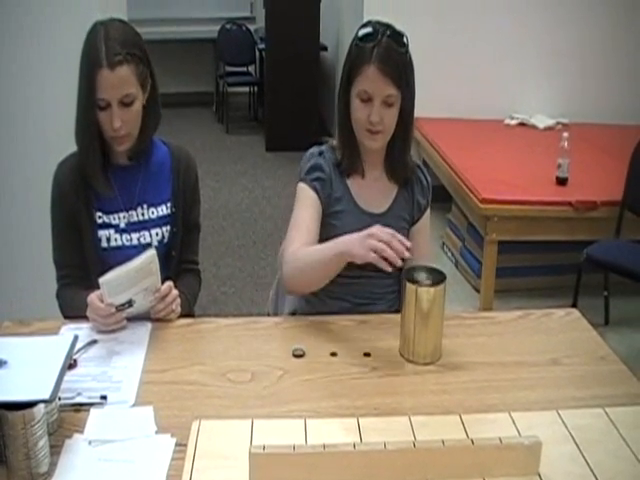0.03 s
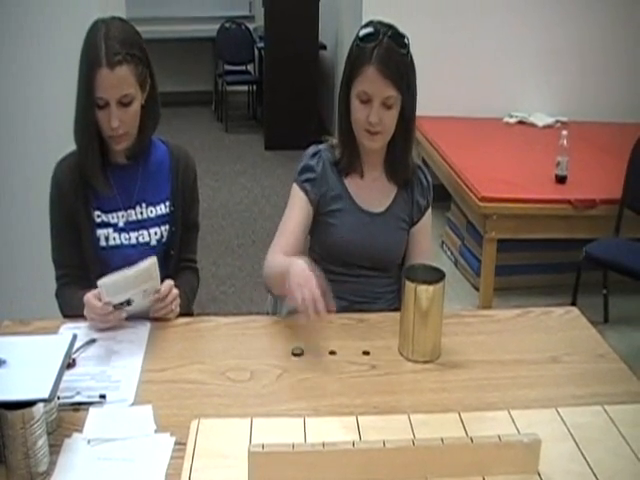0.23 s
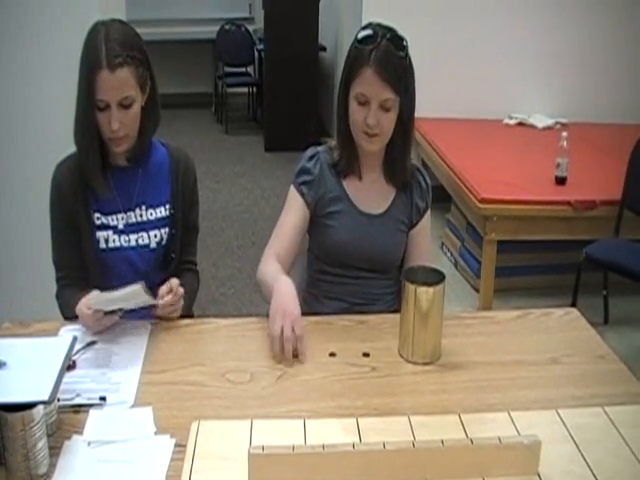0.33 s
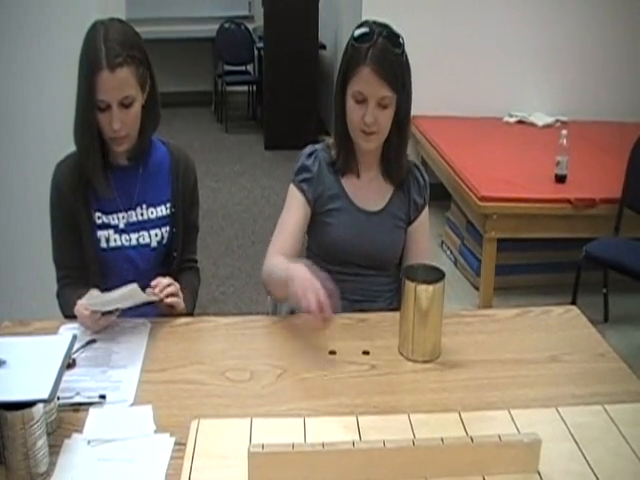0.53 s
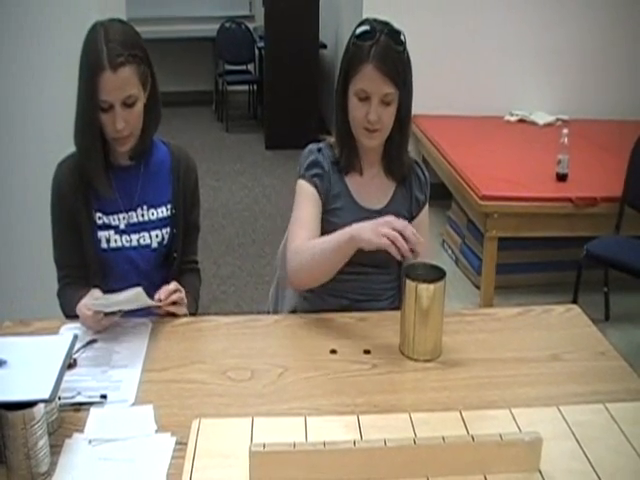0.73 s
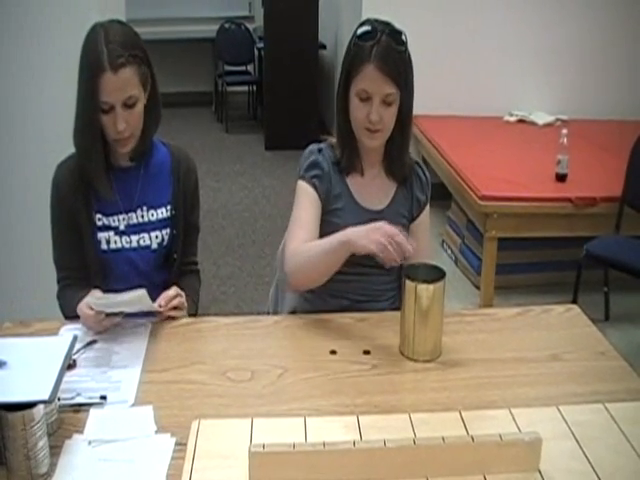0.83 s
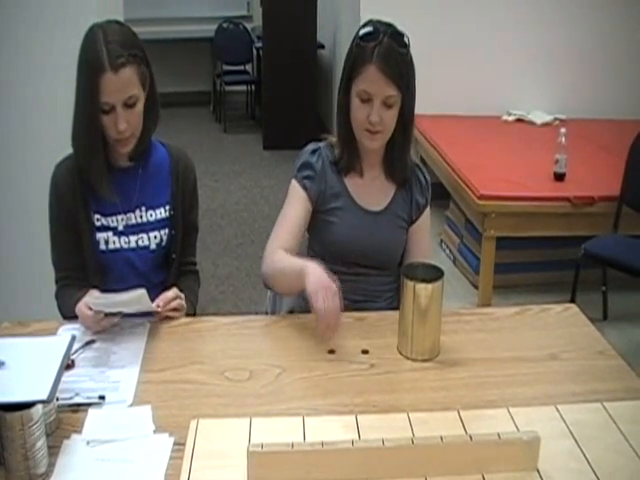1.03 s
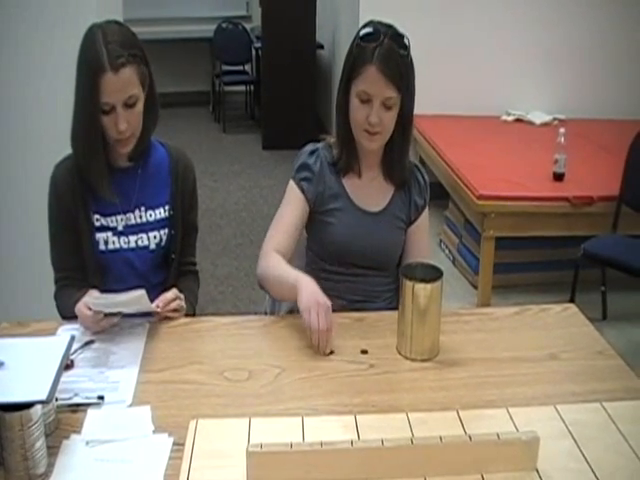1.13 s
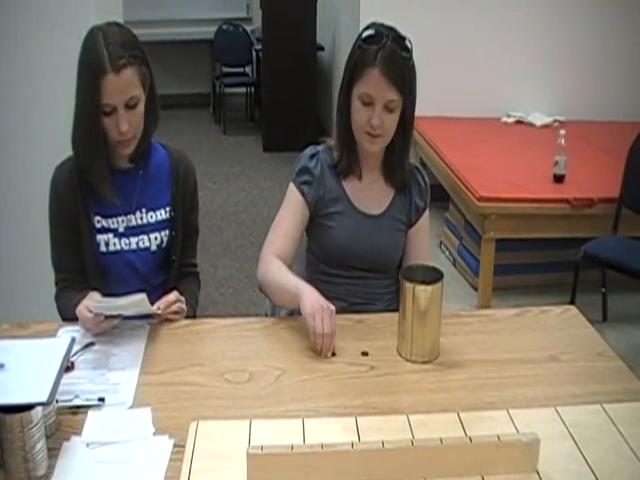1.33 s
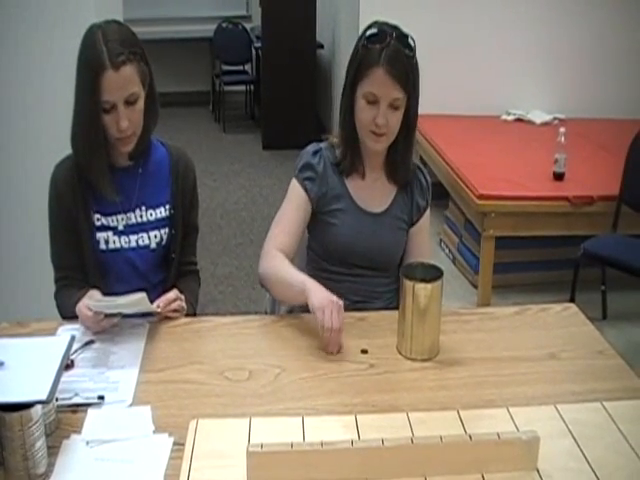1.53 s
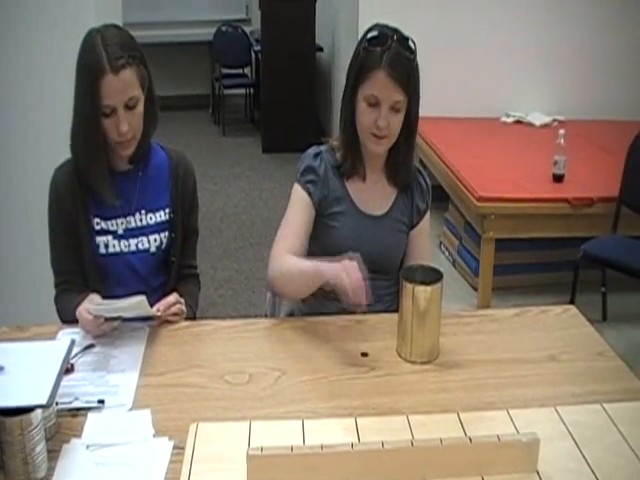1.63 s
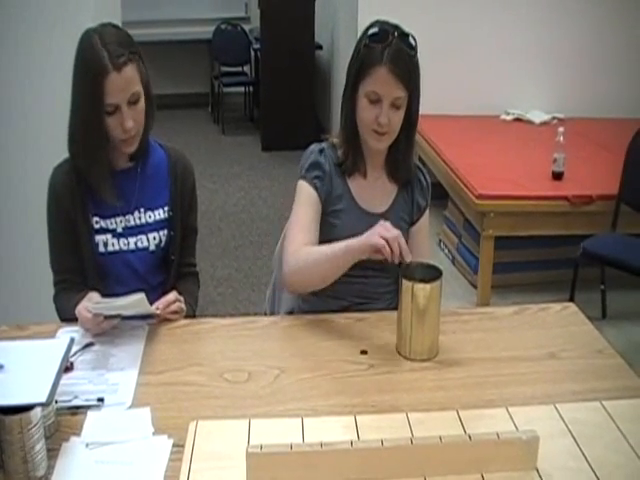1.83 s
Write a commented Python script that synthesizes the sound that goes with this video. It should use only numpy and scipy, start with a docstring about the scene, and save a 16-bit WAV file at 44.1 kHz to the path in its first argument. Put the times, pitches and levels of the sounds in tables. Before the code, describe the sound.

A small hard object drops into an empty metal can at about 0.2 seconds, bounces sharply against the wall and rattles around, fading, with a faint dull thump from the wooden table near 0.5 seconds. A second object lands at 1 second, bounces and rolls until about 1.6 seconds, then the thin ringing dies away. The can is close, in a quiet room with faint ventilation.

```python
"""A quiet room, faint ventilation; an empty metal can on a wooden table, near the stereo microphone.
A small hard object drops in, lands on the bottom, bounces against the wall, then rolls and rattles
round, which keeps the thin metal ringing; the jolted table gives a dull thump. About a second in,
another object lands, bounces and rolls the same way, and the ring dies away into the room."""
import sys
import numpy as np
from scipy import signal
from scipy.fft import rfft, irfft
from scipy.io import wavfile
from scipy.ndimage import uniform_filter1d

SR = 44100
rng = np.random.default_rng(int(sys.argv[2]) if len(sys.argv) > 2 else 0)


def bounce(signal):
    """Save signal as a 16-bit WAV file at the path given by the first command-line argument."""
    frames = np.transpose(np.atleast_2d(signal))
    limited = np.clip(frames, -1, 1)
    pcm = np.round(limited * 32767).astype(np.int16)
    wavfile.write(sys.argv[1], SR, pcm)


N = 83790
RING_T = np.arange(int(.55 * SR)) / SR   # time axis of every ring and echo, in seconds
# The can sounds a little right of centre. Each row: frequency in Hz, left minus right in dB.
CAN_BALANCE = [(250, -6), (550, -2.5), (1200, -1), (5000, -.6), (8500, -2), (13000, -5.5)]


def amp(db):
    """Decibels to gain."""
    return 10 ** (np.asarray(db) / 20)


def at_hz(points, hz):
    """Read a table along log frequency."""
    freqs, values = np.transpose(points)
    return np.interp(np.log(np.maximum(hz, 1)), np.log(freqs), values)


def unit(x):
    """Scale to an energy of one."""
    return x / np.sqrt(np.sum(x ** 2, axis=-1, keepdims=True))


def fade(t60):
    """Exponential decay, 60 dB down after t60 seconds."""
    return np.exp(-np.log(1000) * RING_T / t60)


def colour(x, points):
    """Filter by a table of (Hz, dB)."""
    size = x.shape[-1]
    hz = np.arange(size // 2 + 1) * SR / size
    return irfft(rfft(x) * amp(at_hz(points, hz)), size)


def stereo(mid, side):
    """Left and right from mid and side."""
    return np.array([mid + side, mid - side])


def convolve(x, response):
    """Play a signal through a stereo response."""
    return signal.fftconvolve(np.atleast_2d(x), response, axes=-1)[:, :N]


def sines(hz, t60):
    """One dying sine of unit energy for each mode."""
    return unit(np.sin(2 * np.pi * hz[:, None] * RING_T) * fade(t60[:, None]))


def blows(start_s, db):
    """One click of force for each blow."""
    clicks = np.zeros(N)
    clicks[(start_s * SR).astype(int)] = amp(db)
    return clicks


def ventilation(level_db=-49.5):
    """Room tone: the steady low rumble of ventilation, with a faint hiss."""
    # The moving air. Each row: frequency in Hz, relative level in dB.
    spectrum = [(25, -19), (60, -10), (100, -10), (135, -5), (185, 0.5), (280, -3.5), (400, -6.5),
                (550, -13), (800, -18.5), (1500, -22.5), (4000, -31), (9000, -35), (12000, -46),
                (16000, -46.5)]
    # Its stereo width. Each row: frequency in Hz, side against mid in dB.
    width = [(50, 2.5), (130, -13), (400, -5.5), (3000, -1)]
    mid, side = unit(colour(rng.standard_normal((2, N)), spectrum)) * np.sqrt(N)
    return amp(level_db) * stereo(mid, colour(side, width))


def room(direct, build_up_s=.0016, side_db=-7.5):
    """Diffuse reflections reach the microphone duller than the direct sound; the lows last longest."""
    # Tone of the reverberation. Each row: frequency in Hz, gain in dB.
    tone = [(150, -5.5), (400, -4), (700, -8), (2000, -11), (3500, -8.5), (7000, -20.5), (10000, -21),
            (14000, -25)]
    # Its decay. Each row: frequency in Hz, t60 in seconds.
    decay = [(200, 0.94), (800, 0.69), (3000, 0.4), (7000, 0.61), (13000, 0.65)]
    centres, t60s = np.transpose(decay)
    noise = rfft(rng.standard_normal((2, len(RING_T))))
    hz = np.arange(noise.shape[1]) * SR / len(RING_T)
    tail = 0
    for share, t60 in zip(np.eye(len(decay)), t60s):
        band = at_hz(np.c_[centres, share], hz)
        tail = tail + irfft(noise * band, len(RING_T)) * unit(fade(t60))
    mid, side = colour(tail, tone)
    onset = np.minimum(RING_T / build_up_s, 1)
    return convolve(direct, stereo(mid, amp(side_db) * side) * onset)


def table_thumps(soft_hz=250):
    """Soft jolts ring the low modes of the wooden table top, dead centre."""
    # The jolts. Each row: start in seconds, force in dB.
    jolts = [(.381, -54.5), (0.467, -36.5)]
    # Modes of the wood. Each row: pitch in Hz, level in dB, t60 in seconds.
    modes = [(131.6, -0.5, 0.38), (240.5, 3, 0.36), (305, 5.5, 0.086), (398, 9, .2)]
    top = sum((-1) ** k * amp(db) * np.cos(2 * np.pi * hz * RING_T) * fade(t60)
              for k, (hz, db, t60) in enumerate(modes))
    push = signal.lfilter(*signal.butter(2, soft_hz, fs=SR), blows(*np.transpose(jolts)) + 1e-18)
    return convolve(push, stereo(top, 0))


def metal_ring(modes):
    """A set of the can's modes ringing together, with alternating signs."""
    hz, db, t60 = np.array(modes)
    balance_db = stereo(0, at_hz(CAN_BALANCE, hz) / 2)
    signs = (-1) ** np.arange(len(hz))
    return (amp(db + balance_db) * signs) @ sines(hz, t60)


def wall_rings(count, weak_count=520, crack_db=-5.5, crack_t60_s=.026):
    """The wall struck at several spots: the same modes with new strengths, and a short crack."""
    # The strongest wall modes. Each column: pitch in Hz, level in dB, t60 in seconds.
    main_modes = [
        [526, 785, 1150, 1733, 1849, 2590, 2662, 3909, 4102, 4210, 4300, 4400, 5002, 5803, 6180, 6787, 6861,
         7046, 7148, 7305, 8167, 8298, 8747, 8794, 9846, 10155],
        [-21, -24, -24, -19, -19, -23, -20, -25, -21, -22, -17, -23, -23, -17, -17, -15, -12, -17, -15, -17,
         -17, -18, -15, -16, -20, -21],
        [.25, .15, .22, .22, .2, .15, .2, .22, .2, .17, .18, .16, .2, .22, .16, .17, .2, .17, .17, .2, .17, .17,
         .2, .2, .2, .2],
    ]
    # Tone of the crack and the thicket of weaker modes. Each row: frequency in Hz, relative level in dB.
    spectrum = [(60, -50), (130, -40), (250, -17.5), (400, -16.5), (530, -3.5), (760, -6.5), (930, -11),
                (1130, -5.5), (1350, -12.5), (1600, -9), (1820, -9), (2030, -11), (2400, -9.5), (2660, -11),
                (2900, -9), (3500, -12), (3950, -13), (4280, -6.5), (4650, -11), (5500, -7), (5900, -4),
                (6200, 1.5), (6480, -7.5), (6900, 4), (7200, -2.5), (7550, -6), (7950, -3.5), (8220, -4),
                (8450, 1), (8760, -2), (9100, -4.5), (10600, -7), (12000, -15), (14500, -24), (16000, -41)]
    # Decay of the weaker modes. Each row: frequency in Hz, t60 in seconds.
    weak_decay = [(200, 0.034), (700, 0.16), (2500, 0.13), (7000, 0.19), (15000, .15)]
    # The can's width at the microphone. Each row: frequency in Hz, side against mid in dB.
    width = [(500, -20), (2000, -21.5), (5000, -19.5), (8000, -10), (13000, -6)]
    main_hz, main_db, main_t60 = np.array(main_modes)
    weak_hz = 130 + (np.arange(weak_count) + rng.random(weak_count)) * 15600 / weak_count
    hz = np.r_[weak_hz, main_hz]
    gain = np.r_[unit(amp(at_hz(spectrum, weak_hz))), amp(main_db)]
    rings = sines(hz, np.r_[at_hz(weak_decay, weak_hz), main_t60])
    balance = amp(stereo(0, at_hz(CAN_BALANCE, hz) / 2))
    for _ in range(count):
        signs = rng.choice([-1, 1], len(hz))
        mid = signs * unit(rng.uniform(.81, 1, len(hz))) * np.sqrt(len(hz))
        side = rng.standard_normal(len(hz)) * amp(at_hz(width, hz))
        burst = colour(rng.standard_normal((2, len(RING_T))), spectrum)
        crack = unit(stereo(burst[0], colour(burst[1], width)) * fade(crack_t60_s))
        yield (stereo(mid, side) * gain * balance) @ rings + amp(crack_db) * crack


def contact(treble, lows, crossover_hz=1810):
    """Contact force: the treble of one train of clicks joined to the lows of another."""
    return treble + signal.lfilter(*signal.butter(1, crossover_hz, fs=SR), lows - treble + 1e-18)


def rolling(touches_per_s=900, spread_db=2, level_db=-6.5, lows_db=-7):
    """A rolling object patters against the metal in many small uneven touches."""
    # The rattle of each object as it rolls round. Each row: time in seconds, relative force in dB.
    first_roll = [(.285, -43), (.30, -16.5), (.37, -18.5), (.47, -21.5), (.56, -26), (.66, -32),
                  (.70, -42.5), (.74, -29.5), (.775, -35), (.81, -38), (.85, -32), (.99, -36)]
    second_roll = [(1.04, -24), (1.11, -14), (1.16, -16), (1.18, -16.5), (1.215, -22), (1.245, -16.5),
                   (1.284, -30), (1.318, -16.5), (1.359, -28), (1.398, -17.5), (1.429, -27.5), (1.461, -18),
                   (1.484, -27.5), (1.511, -17), (1.536, -29.5), (1.555, -21), (1.61, -24.5), (1.64, -20)]
    t = np.arange(N) / SR
    force = sum(amp(np.interp(t, *np.transpose(roll), left=-np.inf, right=-np.inf))
                for roll in (first_roll, second_roll))
    touching = rng.random(N) < touches_per_s / SR
    touches = touching * amp(spread_db * rng.standard_normal(N)) * rng.choice([-1, 1], N)
    local_rms = np.sqrt(np.abs(uniform_filter1d(touches ** 2, size=700)) + 1e-6)
    clicks = touches / local_rms * force * amp(level_db)
    return contact(clicks, clicks * amp(lows_db))


def can(spot_count=7, blow_db=14, wall_shake_db=-1.5, low_cut_hz=198):
    """Landings ring the bottom and shake the wall; bounces and rolling meet the wall at several spots."""
    # Each object lands on the bottom. Each row: start in seconds, relative force in dB.
    landings = [(0.23, -5), (1.0101, -8)]
    # Bounces against the wall. Each row: start in seconds, relative force in dB,
    # extra weight of the lows in dB, weight of the hollow clang in dB.
    bounces = [(.2685, -9, -6, -12), (.2757, -.5, -4, -10), (.282, -1.5, 2, -10), (.291, -10, -3, 10),
               (.322, -19, 0, -6), (.351, -12, -3, -2), (.383, -12, 12, 4), (.423, -17, 5, 0),
               (.466, -17, 0, -6), (.553, -20, 2, -6), (.643, -27, 0, -6), (.729, -33, -2, -6),
               (.853, -29, -2, -6), (.94, -28, -5, -6), (.993, -21, -10, -12), (1.028, 1, 1, -10),
               (1.035, -5, 1, -8), (1.046, -13, -1, 18), (1.06, -14, 0, 0), (1.098, -12, 1, 7),
               (1.138, -3, -4, -6), (1.151, -6, -7, -10), (1.237, -15, -1, -3), (1.305, -20, -1, -3),
               (1.33, -14, -3, -3), (1.391, -21, -1, 0), (1.503, -19, -1, 4), (1.511, -19, 0, 0),
               (1.549, -15, 4, -6), (1.594, -20, 0, 0), (1.629, -17, 3, -6)]
    # Modes of the bottom and of the hollow clang. Each column: pitch in Hz, level in dB, t60 in seconds.
    bottom_modes = [
        [703, 830, 940, 1147, 1440, 2664, 2790, 4219, 6116, 6228, 6795, 6898, 7010, 10751],
        [-14, -15, -15, -11, -18, -9, -15, -15, -15, -8, -13, -9, -14, -15],
        [.3, .3, .25, .4, .25, .22, .1, .1, .14, .2, .2, .22, .16, .08],
    ]
    clang_modes = [
        [1733, 1848],
        [-19, -14],
        [.2, .24],
    ]
    shaken_wall, *spot_rings = wall_rings(spot_count + 1)
    landing_s, landing_db = np.transpose(landings)
    landing_ring = metal_ring(bottom_modes) + amp(wall_shake_db) * shaken_wall
    bottom = convolve(blows(landing_s, blow_db + landing_db), landing_ring)
    bounce_s, bounce_db, lows_db, clang_db = np.transpose(bounces)
    force_db = blow_db + bounce_db
    clang = convolve(blows(bounce_s, force_db + clang_db), metal_ring(clang_modes))
    patter = rolling()
    touched_spot = rng.integers(0, spot_count, N)
    wall = 0
    for spot, ring in enumerate(spot_rings):
        here = slice(spot, None, spot_count)   # the bounces take the spots in turn
        treble = blows(bounce_s[here], force_db[here])
        lows = blows(bounce_s[here], force_db[here] + lows_db[here])
        wall = wall + convolve(contact(treble, lows) + patter * (touched_spot == spot), ring)
    low_cut = signal.butter(3, low_cut_hz, "high", fs=SR, output="sos")
    return signal.sosfilt(low_cut, bottom + clang + wall)


def scene():
    """At the microphone: can and table, their reflections and the room tone."""
    direct = can() + table_thumps()
    return direct + room(direct) + ventilation()


def record(dry):
    """The microphone chain rounds the peaks and cuts the highest treble."""
    ceiling, stop_hz = 1.3, 16500
    rounded = ceiling * np.tanh(dry / ceiling)
    return signal.sosfilt(signal.cheby2(14, 60, stop_hz, fs=SR, output="sos"), rounded)


dry = scene()
out = record(dry)
bounce(out)
```